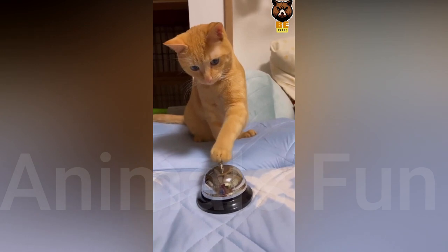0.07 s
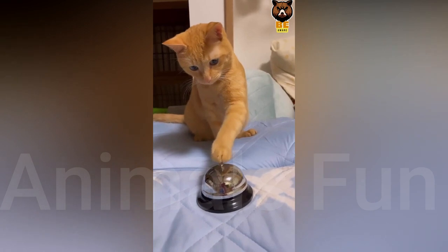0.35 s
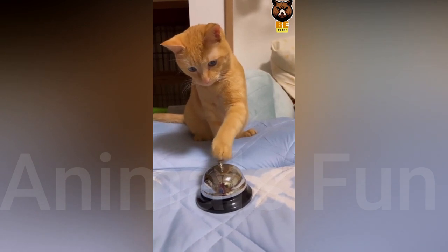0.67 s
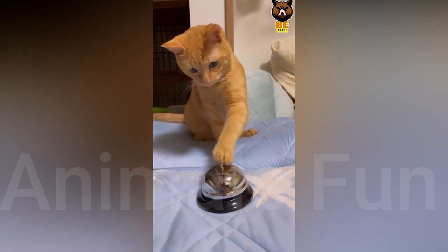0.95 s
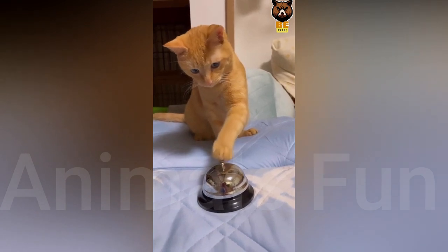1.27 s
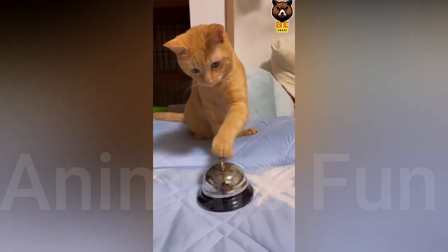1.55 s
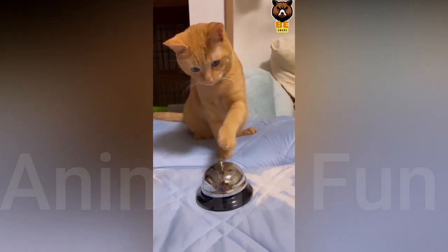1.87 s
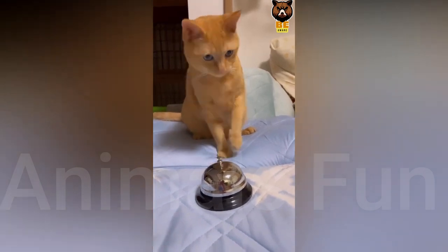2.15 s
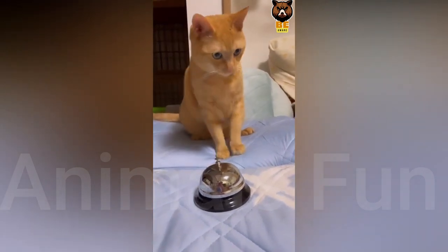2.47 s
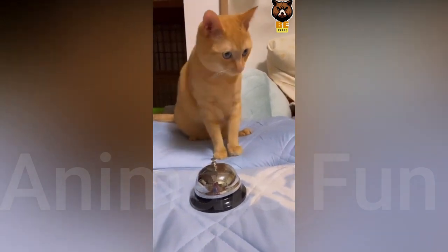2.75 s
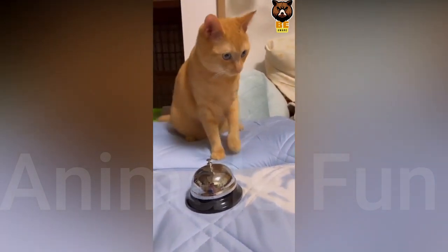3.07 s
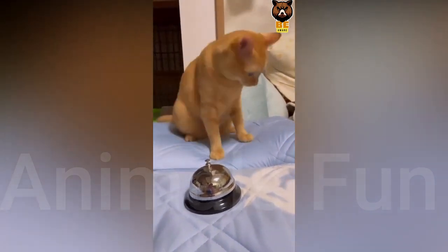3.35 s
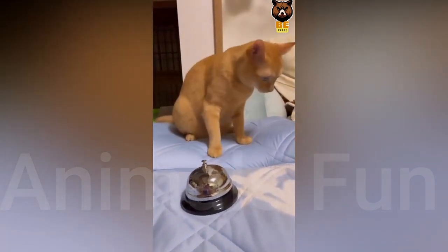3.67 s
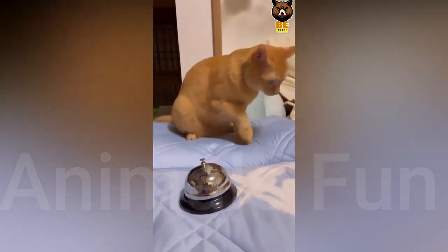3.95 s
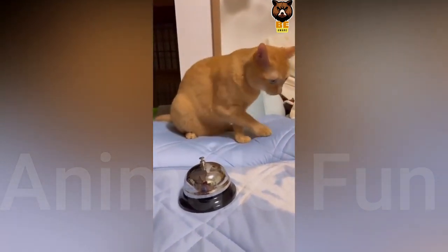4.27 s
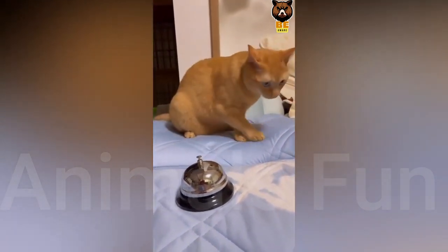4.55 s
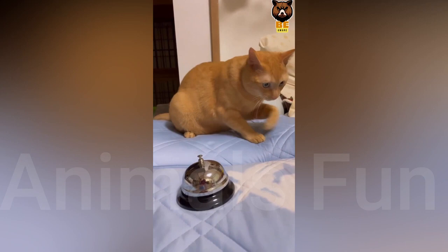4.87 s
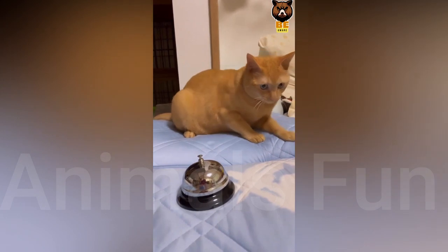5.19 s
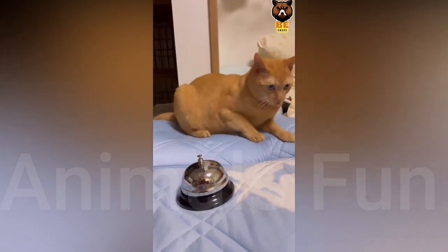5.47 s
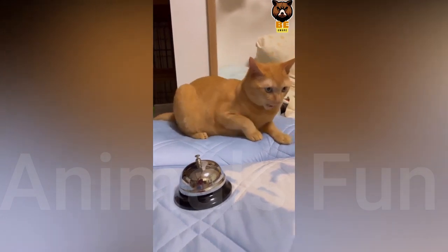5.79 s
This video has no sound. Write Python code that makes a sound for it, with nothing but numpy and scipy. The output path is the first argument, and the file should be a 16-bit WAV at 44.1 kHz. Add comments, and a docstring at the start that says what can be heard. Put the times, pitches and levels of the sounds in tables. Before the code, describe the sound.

A cat taps a metal desk bell seven times, with rattles between the dings, then the ring fades over a low fan hum.

```python
"""A fan hums in a small room. A cat pats a steel desk bell on a quilt, and the loose plunger rattles down.
From 0.4 to 1.8 s the clapper hits the dome seven times, and a limiter briefly turns everything down
at each ding. Between the dings the plunger springs back with a knock. From about 3 s the cat lies
down, its fur brushing the quilt, while the dome rings out."""
import sys
import numpy as np
from scipy import signal
from scipy.io import wavfile
from scipy.ndimage import uniform_filter1d

SR = 44100
rng = np.random.default_rng(int(sys.argv[2]) if len(sys.argv) > 2 else 0)


def transcribe(u):
    """Save the signal u as a 16-bit wav file named by the first command-line argument.

    u: samples, shape (n,) or (channels, n), limited to [-1, 1]; the rate is SR.
    q: integer samples, one column per channel.
    """
    v = np.clip(np.atleast_2d(u).T, -1, 1)
    q = np.round(v * 32767).astype(np.int16)
    wavfile.write(sys.argv[1], SR, q)


N = 265693
TIME = np.arange(N) / SR

# How alike left and right are, for room noise and for noise at the bell (1 or more is the same,
# -1 or less is opposite): pitch_hz, likeness
ROOM_LIKENESS = [(100, 1), (250, 1), (600, 0.18), (1500, 0.99), (4000, 0.35), (12000, 0.282)]
NEAR_LIKENESS = [(200, 1), (900, 0.92), (1700, 1), (3500, 0.84), (5500, -0.06), (7500, -.95), (9500, -1.3),
                 (11500, 0.73), (14000, 0.25)]
# The tone colour of each noise, from low to high: pitch_hz, relative_level_db
AIR_COLOUR = [(25, -93), (40, -79), (60, -64), (100, -58.5), (160, -77.5), (350, -64), (550, -85),
              (800, -75), (1400, -85), (2400, -90), (4000, -100.1), (6000, -110.4), (8000, -115.7),
              (13000, -139.8)]   # air moved by the fan
FUR_COLOUR = [(1500, -6), (3500, -2.5), (6000, -14), (8000, -27), (11000, -5.5), (14000, -21)]   # fur on cloth
THUD_COLOUR = [(60, -2.5), (130, -11.5), (210, 6.5), (300, -5), (480, -6), (800, -11.5), (2000, -17.5),
               (4000, -23.5), (8000, -28.5), (13000, -43.5)]   # the bell's base in the padding
STOP_COLOUR = [(100, -8), (210, 4), (300, -9), (480, 1.5), (800, -10), (2000, -1), (3000, -8.5),
               (5000, -18), (8000, -28.5), (14000, -40)]   # the plunger against its stop
SHUDDER_COLOUR = [(100, -3), (210, 6), (300, -5), (480, 1), (800, -3.5), (2000, 0.5), (3000, -7),
                  (5000, -12), (8000, -27.5), (14000, -41.5)]   # the bell's body after a blow
CRACK_COLOUR = [(100, -3.5), (220, 8), (330, 1), (700, 0), (1500, 6.5), (2800, 6), (4200, 9.5), (5500, -1),
                (7500, -3.5), (9500, 10), (11500, 0), (14000, -15.5)]   # metal hitting metal

# Steady tones of the fan's motor: pitch_hz, level_db
MOTOR_HUMS = [(90.3, -44.5), (119.8, -45.5), (313.8, -48)]
# Where the fan's housing and the room boom: pitch_hz, width_hz, level_db
FAN_RESONANCES = [(95.8, 8.4, -44.5), (121, 15, -52.5), (201.3, 36.6, -50), (314.2, 18, -51),
                  (342.8, 31, -47.5), (450.2, 14, -61.5), (491.8, 115, -56), (589, 66, -58.5)]
# The cat brushes over the quilt: middle_s, level_db, length_s
BRUSHES = [(2.954, -64.5, .07), (3.296, -68, 0.44), (3.565, -65, 0.25), (3.793, -61.5, 0.25),
           (4.604, -67, .1), (4.786, -61.5, 0.31), (5.19, -69, 0.17), (5.411, -66, 0.15),
           (5.632, -64.5, 0.36), (5.93, -69, 0.084)]
# The paw leans on the bell and rocks it in the quilt: middle_s, level_db, length_s
PRESSES = [(0.194, -42, 0.65), (0.836, -42, 0.16), (1.347, -38, 0.083)]
# The plunger rattles in its sleeve, at light touches and before each blow: middle_s, level_db, length_s
RATTLES = [(0.042, -20.5, 0.0053), (0.096, -22, .0025), (0.0996, -29.5, 0.0071), (0.146, -22, .007),
           (0.1602, -12, 0.0032), (0.168, -28, .006), (0.176, -32, .004), (0.2206, -21.5, 0.0072),
           (0.258, -32, 0.0038), (0.266, -31, 0.0048), (0.34, -41, 0.012), (0.36, -36, .003),
           (0.3662, -15.5, 0.0035), (0.5092, -6.5, .005), (0.809, -33.5, .04), (0.8804, -9.5, .0032),
           (1.068, -21.5, 0.004), (1.3248, -12, .007), (1.535, -8, 0.0057), (1.795, -12, 0.0054),
           (2.076, -43, 0.063)]
# The plunger springs back against its stop: start_s, knock_db, jingle_db, clatter_db
KNOCKS = [(0.1476, -20.5, -53, -44.5), (0.46, -21.5, -28, -40), (.597, -24.5, -65, -48),
          (0.7024, -32, -64, -43), (0.8024, -24, -34.5, -42), (0.9748, -24, -46.5, -47),
          (1.1617, -20, -28.5, -40), (1.412, -23.5, -62, -44.5), (1.663, -24, -33, -43),
          (1.878, -28.5, -30, -41)]
# A mode is one way a part likes to vibrate; a wider mode dies away sooner.
# Modes of the plunger and its spring: pitch_hz, width_hz, relative_level_db, left_lead_rad
PLUNGER_MODES = [(3960, 300, -18, 1.6), (4634, 280, -9, 0.842), (5550, 96, -12.5, 0.61),
                 (5928, 75, -10.5, 0.64), (6630, 160, -8.5, 2.3), (7060, 130, -19.5, 3.8),
                 (8420, 70, -14.5, 4.7), (9040, 170, -3.5, 1.8), (9390, 300, -1, 1.5),
                 (11300, 342, 0.5, 0.8), (12150, 230, -4, 1.4), (12700, 140, -11, 0.96)]
# Modes of the clapper and the base: pitch_hz, width_hz, relative_level_db, left_lead_rad
CLAPPER_MODES = [(2956, 30, -12.5, 1.5), (3180, 50, -17, -.5), (3290, 35, -13.5, -.5), (3400, 40, -18, .5),
                 (3499, 30, -11, 1.5), (3810, 45, -10, .7), (3890, 40, -15, .7), (4073, 25, -5.5, -.7),
                 (4220, 50, -18, 2), (4400, 60, -17, 2), (4720, 50, -16, 1), (4830, 45, -17, -1),
                 (5520, 60, -12, -1.5), (5950, 40, -18, 2), (6540, 60, -23, 2.4), (6760, 90, -25, -2),
                 (7050, 120, -21, -2), (8870, 70, -8, 1.68), (9620, 100, -9, 0.3), (10200, 120, -6, 0),
                 (10600, 100, -7, 0), (10868, 45, -7, 1.2), (11570, 120, -15, 2.3)]
# The clapper hits the dome: start_s, force_db, crack_db, clatter_db, clatter_hold_s
STRIKES = [(0.3822, -8.5, -21.5, -31.5, 0.024), (0.5166, 0.5, -4, -21.5, 0.042),
           (0.8899, -1.5, -8, -21.5, 0.031), (1.0813, -1.5, -9, -24.5, 0.047),
           (1.3374, -8.5, -17.5, -26.5, 0.028), (1.5447, -0.5, -14, -28.5, .03),
           (1.8042, -0.07, -13.5, -25, 0.028)]
# The six tones that make up a ding: pitch_hz
DOME_TONES_HZ = [934.8, 963.8, 2488, 4604, 7253, 10375]
# One list per tone. Close pitches make a tone pulse; the fourth tone's faint outer pair adds a quick
# shimmer. Here and below, fade_s is the time to fall by 60 dB.
# Each pitch: offset_hz, level_db, fade_s, left_minus_right_db, left_lead_rad, sign
CLOSE_PITCHES = [
    [(0.042, -1.5, 13.7, 2.5, 0.209, 1)],
    [(0.0007, -2.5, 36, -3.5, 0.44, 1)],
    [(0, 0, 9.0, -3.5, 1.48, 1), (1.72, -11.5, 7, -3, 1.6, -1)],
    [(-10.5, -14, 2.9, 5, -.5, -1), (-3.4, -12.5, 2.4, -9, -.4, 1), (4.2, -1, 2.7, 1, -.8, 1),
     (18.7, -16.5, 3.2, 2, -.6, -1)],
    [(-2.35, -4.5, 1.12, -.5, 2.75, 1), (1.9, -1.5, 1.12, -.3, 2.8, 1)],
    [(0.0041, -1.5, 0.44, 0.5, 0.44, 1)],
]
# How loudly each tone rings after each blow, relative to its force.
# A row per blow, a column per tone: share_db
TONE_SHARES_DB = [(-35, -38, -30.5, -26.5, -10.5, 0), (-37.5, -40, -34.5, -29.5, -13, 0.0035),
                  (-30.5, -42.5, -31.5, -26.5, -12.5, 0), (-33.5, -41.5, -31, -22, -14, 0),
                  (-35, -34.5, -29.5, -28.5, -7.5, 0), (-37, -38, -31.5, -32, -14, 0.0011),
                  (-33, -52.5, -33, -34, -12.5, 0)]


def from_db(db):
    """Turn decibels into a number to multiply by."""
    return 10 ** (np.asarray(db) / 20)


def unit_level(wave):
    """Scale a wave so that its average level (rms) is 1."""
    return wave / np.sqrt(np.mean(wave ** 2) + 1e-20)


def value_at(table, hz):
    """Read a table at any pitch, sliding between its rows."""
    pitches, values = np.transpose(table)
    return np.interp(np.log(hz), np.log(pitches), values)


def dying(start_s, fade_s):
    """A level that jumps to 1 and dies away."""
    age = TIME - start_s
    return (age >= 0) * from_db(-60 * np.clip(age / fade_s, 0, 4))


def swell(middle_s, length_s):
    """A level that rises smoothly to 1 and falls again."""
    return np.exp(-np.minimum(((TIME - middle_s) / (0.55 * length_s)) ** 2, 50))


def held(start_s, hold_s, rise_s, fade_s):
    """A level that rises to 1, stays there a moment and dies away."""
    age = np.maximum(TIME - start_s, 0)
    return (1 - np.exp(-age / rise_s)) * from_db(-60 * np.clip((age - hold_s) / fade_s, 0, 4))


def ping(start_s, pitch_hz, fade_s):
    """One pure tone that starts suddenly and dies away."""
    return dying(start_s, fade_s) * np.sin(2 * np.pi * pitch_hz * (TIME - start_s))


def smooth(wave, lag_s):
    """Follow a wave with a short lag, which rounds off its jumps."""
    keep = np.exp(-1 / (lag_s * SR))
    return signal.lfilter([1 - keep], [1, -keep], wave)


def to_stereo(wave, lead_rad, pan_db=0):
    """A complex wave reaches left and right, each with its own level and point in the cycle."""
    side = np.array([[.5], [-.5]])
    return np.imag(wave * from_db(pan_db * side) * np.exp(1j * lead_rad * side))


def coloured_noise(colour, likeness):
    """Stereo noise built in half-octave bands, each with its own level and left-right likeness."""
    out, edges = 0, np.geomspace(20, 16000, 20)
    white = rng.standard_normal((2, 2, N))
    for k, (low, high) in enumerate(zip(edges, edges[1:])):
        band = signal.butter(3, [low, high], "band", fs=SR, output="sos")
        mid, side = signal.sosfilt(band, white[k % 2])
        hz = np.sqrt(low * high)
        alike = np.clip(value_at(likeness, hz), -1, 1)
        stereo = np.sqrt(1 + alike) * mid + np.sqrt(1 - alike) * side * [[1], [-1]]
        out = out + from_db(value_at(colour, hz)) * stereo
    return unit_level(out)


def resonant_noise(hz, width_hz):
    """Random pushes keep one mode sounding; gives a complex wave whose .imag has level 1."""
    pole, run_in = np.exp((-np.pi * width_hz + 2j * np.pi * hz) / SR), SR // 4
    wave = signal.lfilter([1], np.poly([pole, pole]), rng.standard_normal(N + run_in))[run_in:]
    return wave / np.std(wave.imag)


def flicker(spread_db, rate_hz, width_hz):
    """A level that wobbles at random around 1."""
    return from_db(spread_db * resonant_noise(rate_hz, width_hz).imag)


def fan():
    """The motor hums, and the housing and room boom, over a soft rush of air."""
    air = from_db(-42) * coloured_noise(AIR_COLOUR, ROOM_LIKENESS)
    air *= from_db([[.25], [-.25]])   # a little louder on the left
    hum = sum(from_db(db) * np.sqrt(2) * np.sin(2 * np.pi * (hz * TIME + rng.random()))
              for hz, db in MOTOR_HUMS)
    boom = sum(from_db(db) * resonant_noise(hz, width).imag for hz, width, db in FAN_RESONANCES)
    return air + hum + boom


def fur():
    """Fur brushes over uneven cloth. A faint steady hiss lies under the strokes."""
    steady_hiss = from_db(-73)
    strokes = sum(from_db(db) * swell(s, length) for s, db, length in BRUSHES)
    uneven = flicker(spread_db=2.5, rate_hz=10, width_hz=30)
    return (steady_hiss + strokes) * uneven * coloured_noise(FUR_COLOUR, ROOM_LIKENESS)


def quilt_thuds():
    """The base thuds into the padding under the paw, and bobs after each knock of the plunger."""
    pressed = sum(from_db(db) * swell(s, length) for s, db, length in PRESSES)
    bobbing = sum(from_db(db - 19.5) * dying(s, fade_s=0.246) for s, db, *_ in KNOCKS)
    return (pressed + bobbing) * coloured_noise(THUD_COLOUR, NEAR_LIKENESS)


def jingle(modes):
    """Countless tiny touches, coming in clumps, keep a loose metal part ringing."""
    out = 0
    for hz, width, db, lead in modes:
        clumps = flicker(spread_db=3.5, rate_hz=30, width_hz=60)
        out = out + to_stereo(from_db(db) * clumps * resonant_noise(hz, width), lead)
    return unit_level(out)


def plunger_rattle():
    """The plunger ticks and chatters in its sleeve; its spring jingles just after each knock."""
    touches = unit_level(flicker(spread_db=3.5, rate_hz=530, width_hz=530))
    chatter = touches * sum(from_db(db - 8.5) * swell(s, length) for s, db, length in RATTLES)
    after_ring = sum(from_db(db - 21) * dying(s - length / 2, fade_s=.11) for s, db, length in RATTLES)
    spring = 0
    for s, _, jingle_db, _ in KNOCKS:
        shape = swell(s + 0.0082, length_s=0.037) + from_db(-11.5) * dying(s, fade_s=0.18)
        spring = spring + from_db(jingle_db - 3) * shape
    ticks = from_db(-8.5) * chatter * coloured_noise(CRACK_COLOUR, NEAR_LIKENESS)
    return (chatter + after_ring + spring) * jingle(PLUNGER_MODES) + ticks


def plunger_knock():
    """The plunger springs back to its stop with a dull knock, and the base gives a hollow ring."""
    knock, ring, firm_db = 0, 0, -22.5
    for s, db, *_ in KNOCKS:
        edge = from_db(db - firm_db) * dying(s, fade_s=0.017)   # softer knocks lose their sharp edge
        tail = from_db(-7) * dying(s, fade_s=0.12)
        knock = knock + from_db(db - 7) * (edge + tail)
        ring = ring + from_db(db - 8.5) * ping(s, pitch_hz=614, fade_s=0.098)
    return knock * coloured_noise(STOP_COLOUR, NEAR_LIKENESS) + ring


def clinks(force, modes, touches_per_s, spread_db, rise_s):
    """Separate, uneven touches each set the modes ringing with new strengths."""
    count = int(touches_per_s * N / SR)
    moments = ((np.arange(count) + rng.random(count)) * N / count).astype(int)
    uneven = unit_level(from_db(spread_db * rng.standard_normal(count)))
    sizes = force[moments] * uneven * np.sqrt(N / count)
    power = sum(from_db(db) ** 2 for _, _, db, _ in modes)
    out, keep = 0, np.exp(-1 / (rise_s * SR))
    for hz, width, db, lead in modes:
        hits = np.full(N, 1e-18)
        hits[moments] += sizes * rng.standard_normal(count)
        pole = np.exp((-np.pi * width + 2j * np.pi * hz) / SR)
        ringing = signal.lfilter([1 - keep], np.poly([pole, keep * pole]), hits)
        scale = np.sqrt(2 * (1 - abs(pole) ** 2) / power)   # a steady force of 1 gives a level near 1
        out = out + to_stereo(from_db(db) * scale * ringing, lead)
    return out


def base_clatter():
    """The clapper and base clatter after each blow, and more softly when the plunger comes back."""
    shaken = sum(from_db(db) * held(s, hold, rise_s=0.0017, fade_s=0.081) for s, *_, db, hold in STRIKES)
    jolted = sum(from_db(db) * dying(s, fade_s=0.23) for s, *_, db in KNOCKS)
    clatter = clinks(shaken + jolted, CLAPPER_MODES, touches_per_s=200, spread_db=2, rise_s=.0005)
    return from_db(1) * clatter


def clapper():
    """At each blow the rim cracks, the body shudders and the clapper itself gives a hard, dead clack."""
    crack, shudder, clack = 0, 0, 0
    for s, force_db, crack_db, *_ in STRIKES:
        crack = crack + from_db(crack_db) * dying(s, fade_s=0.011)
        shudder = shudder + from_db(.5 * force_db - 27.5) * dying(s, fade_s=0.25)
        clack = clack + from_db(crack_db - 4.5) * ping(s, pitch_hz=1904, fade_s=0.0023)
    rim = crack * coloured_noise(CRACK_COLOUR, NEAR_LIKENESS)
    body = shudder * coloured_noise(SHUDDER_COLOUR, NEAR_LIKENESS)
    return rim + body + clack


def dome():
    """Each blow restarts the steel dome's ring. Close pitches drift out of step, so the sound pulses."""
    start_s, force_db = np.transpose(STRIKES)[:2]
    latest_blow = np.maximum(np.searchsorted(start_s, TIME, side="right") - 1, 0)
    age = TIME - start_s[latest_blow]
    out = 0
    for hz, pitches, share_db in zip(DOME_TONES_HZ, CLOSE_PITCHES, np.transpose(TONE_SHARES_DB)):
        struck_db = (force_db + share_db)[latest_blow]
        tone = np.sqrt(2) * np.exp(2j * np.pi * hz * TIME)
        for offset_hz, level_db, fade_s, pan_db, lead, sign in pitches:
            size = (age >= 0) * sign * from_db(struck_db + level_db - 60 * np.abs(age) / fade_s)
            drift = np.exp(2j * np.pi * offset_hz * age)
            swing = smooth(size * drift, lag_s=0.000075)   # the new ring takes over during the contact
            out = out + to_stereo(swing * tone, lead, pan_db)
    return out


def scene():
    """The bell close by on its quilt, with the cat beside it and the fan behind."""
    bell = dome() + clapper() + base_clatter() + plunger_rattle() + plunger_knock()
    return bell + fur() + quilt_thuds() + fan()


def limiter(level, threshold_db, release_db_per_s, attack_s):
    """A volume control that drops quickly when the level passes the threshold, then comes back up."""
    over_db = np.maximum(20 * np.log10(level + 1e-9) - threshold_db, 0)
    recovery_db = release_db_per_s * TIME
    cut_db = np.maximum.accumulate(over_db + recovery_db) - recovery_db
    return from_db(-smooth(cut_db, attack_s))


def record(dry):
    """A slow limiter turns the dings down, a fast one catches their peaks, and the top treble is cut."""
    power = uniform_filter1d(np.mean(dry ** 2, axis=0), size=220)   # averaged over 5 ms
    loudness = np.sqrt(np.abs(power))
    ducked = dry * limiter(loudness, threshold_db=-7.5, release_db_per_s=17.0, attack_s=0.0026)
    coming_peak = np.roll(np.abs(ducked).max(axis=0), -int(.001 * SR))   # looks 1 ms ahead
    caught = ducked * limiter(coming_peak, threshold_db=-.8, release_db_per_s=1200, attack_s=.0003)
    treble_cut = signal.cheby2(14, 70, 14700, fs=SR, output="sos")   # 70 dB down from 14700 Hz up
    return signal.sosfilt(treble_cut, caught)


dry = scene()
out = record(dry)
transcribe(out)
```